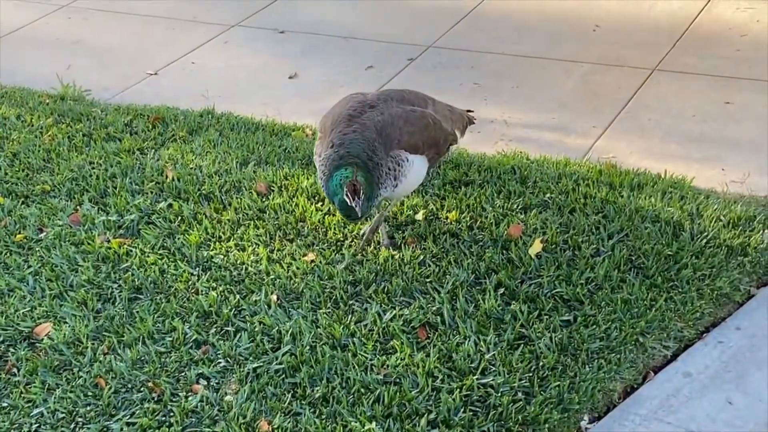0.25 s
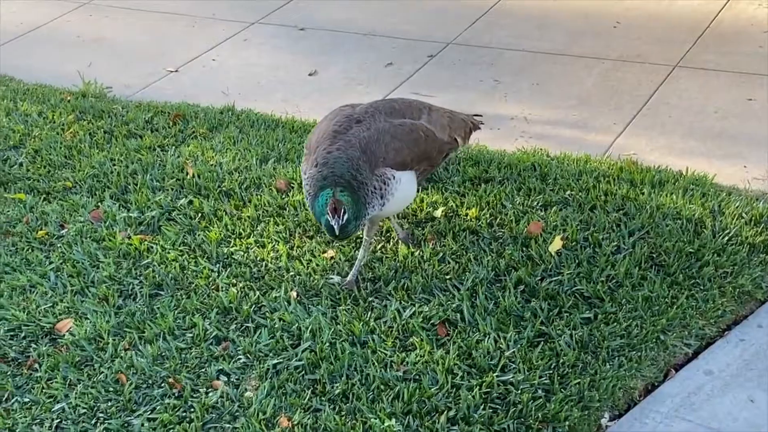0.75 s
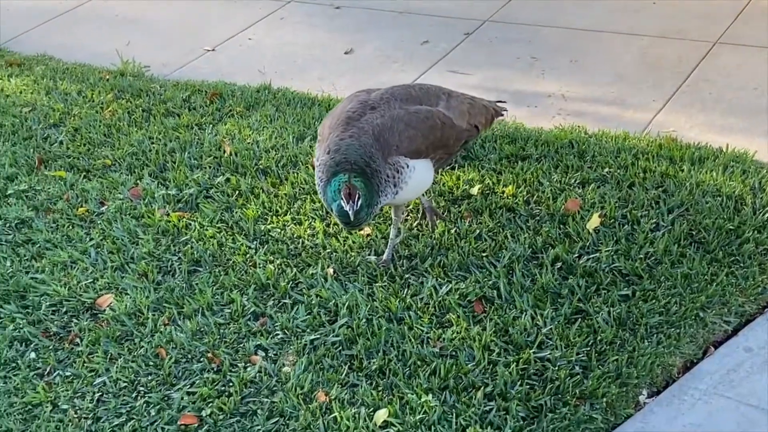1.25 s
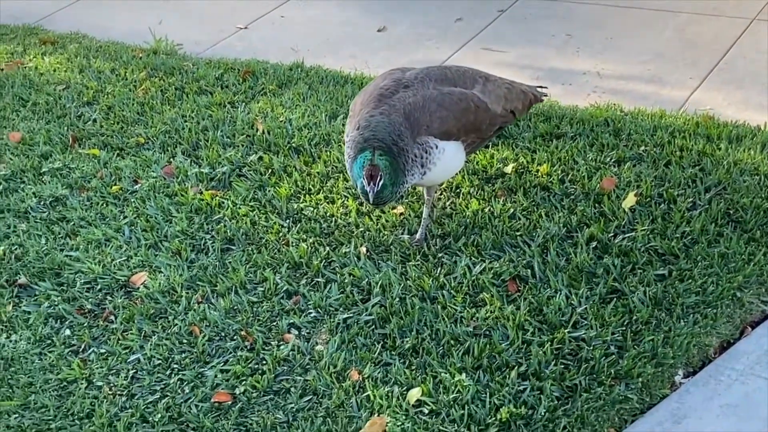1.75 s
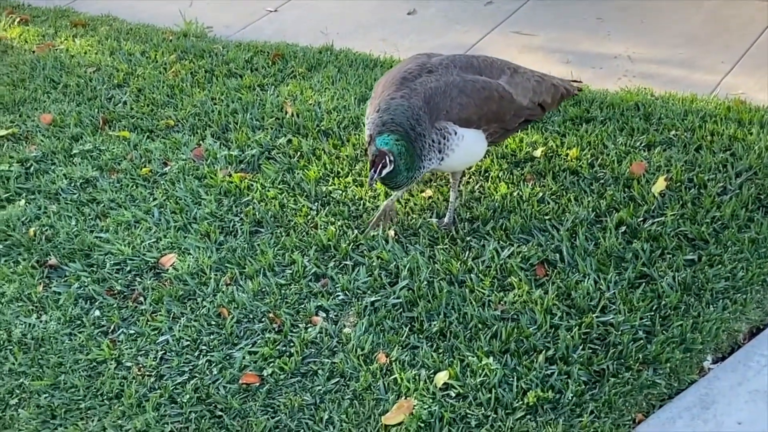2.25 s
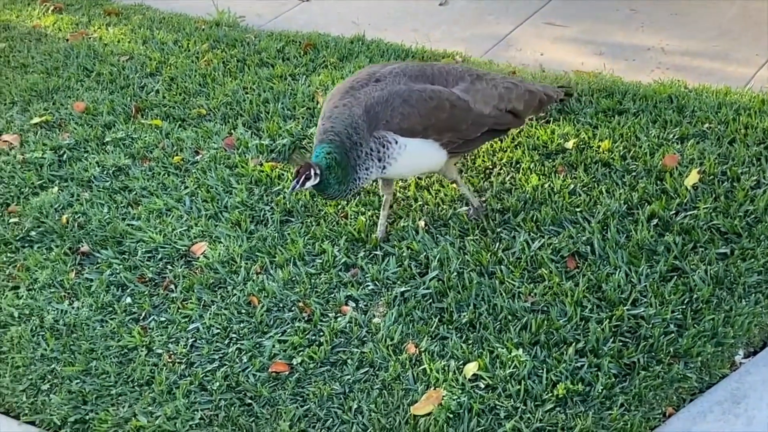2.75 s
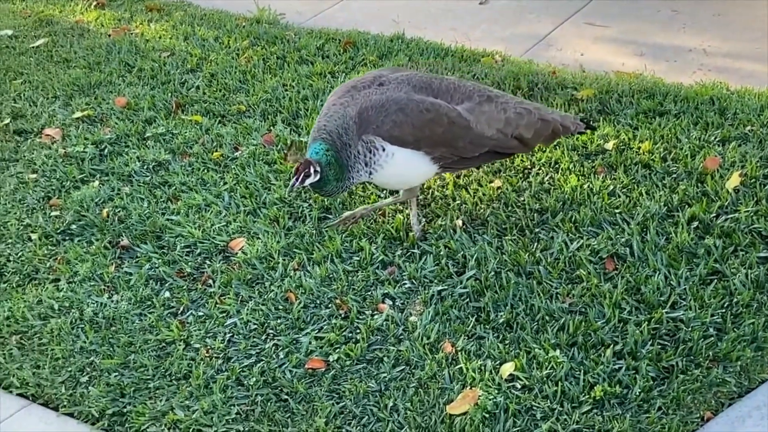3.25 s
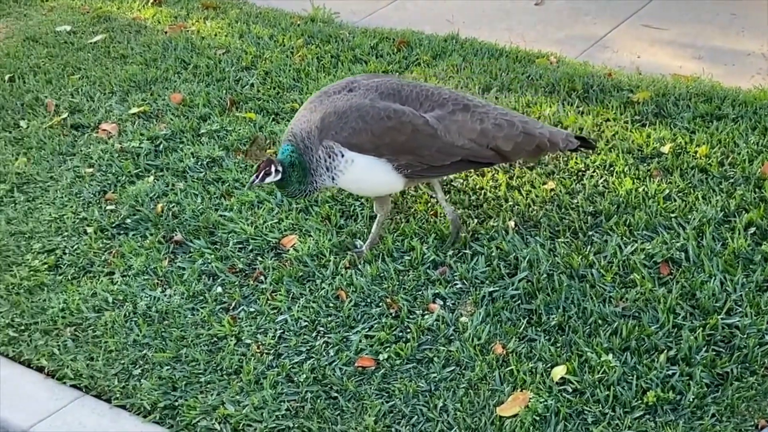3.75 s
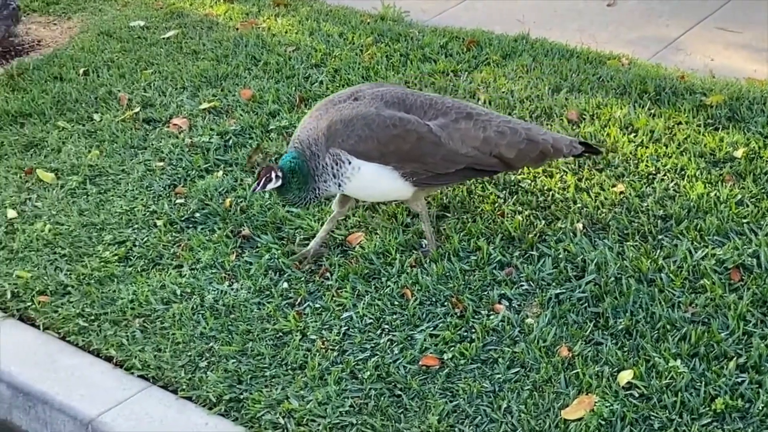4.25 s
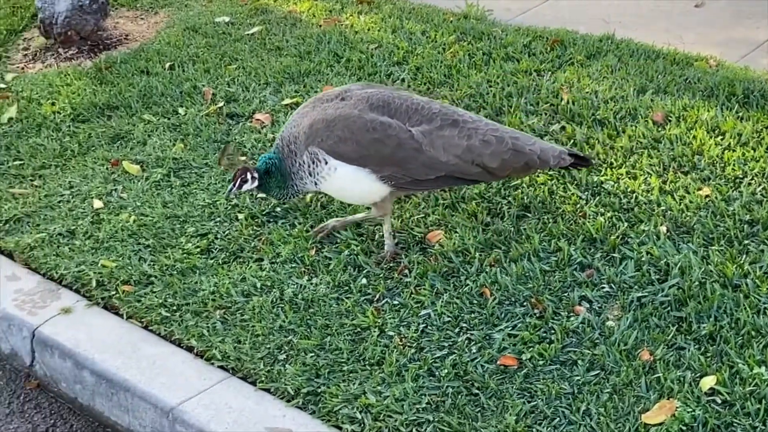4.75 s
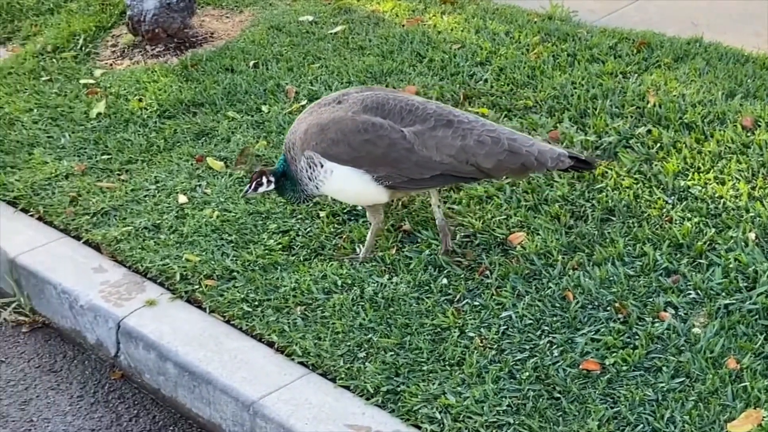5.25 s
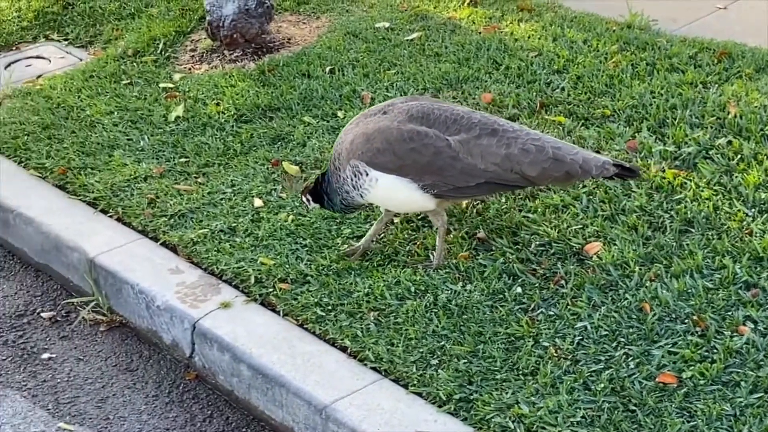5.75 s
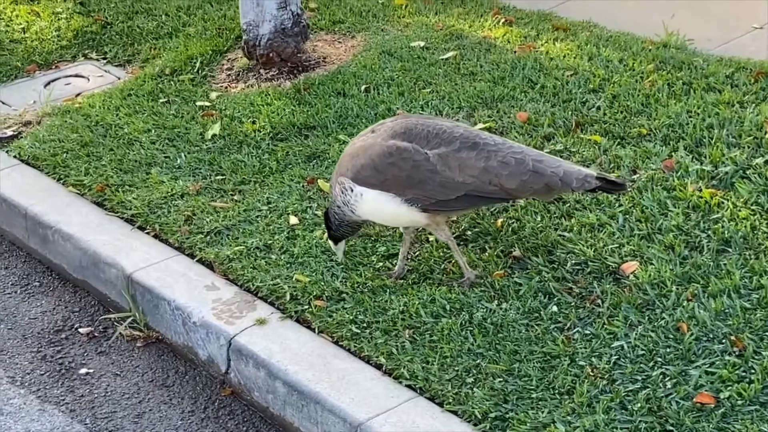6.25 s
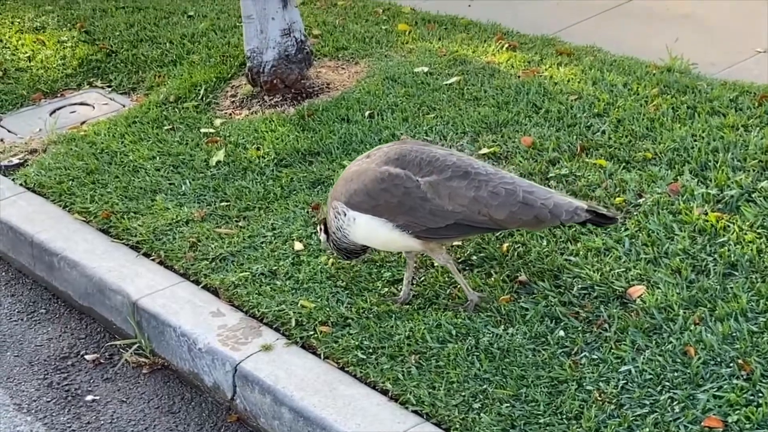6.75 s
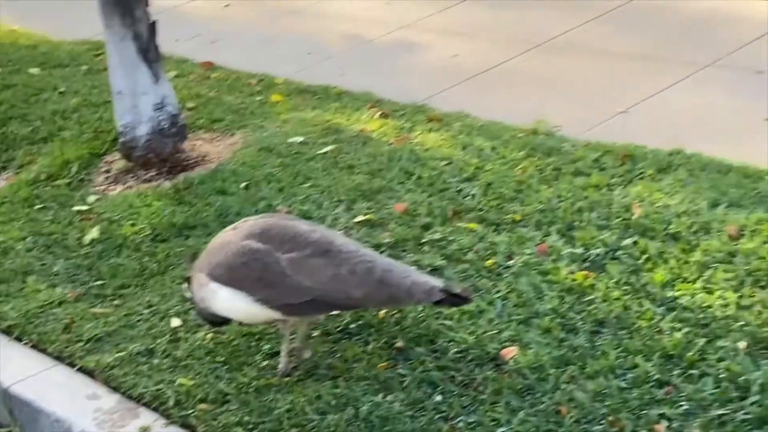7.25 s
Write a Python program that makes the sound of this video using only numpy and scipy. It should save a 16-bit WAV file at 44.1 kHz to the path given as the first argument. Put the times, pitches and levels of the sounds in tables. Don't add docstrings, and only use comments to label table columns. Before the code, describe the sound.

Outdoors on grass beside a quiet residential street, picked up by a hand-held phone. Distant traffic rumbles while a songbird rattles off quick steep chips and far birds whistle. Light footsteps crackle in dry grass. A crow caws three times, rough and throbbing. A car approaches with low tyre noise and engine hum, then a peafowl clucks and gives two loud, nasal screams that bounce off house walls.

```python
import sys
import numpy as np
from scipy import signal
from scipy.fft import rfft, irfft, next_fast_len
from scipy.io import wavfile
from scipy.ndimage import uniform_filter1d, minimum_filter1d

SR = 44100
rng = np.random.default_rng(int(sys.argv[2]) if len(sys.argv) > 2 else 0)


def dump(signal):
    limited = np.clip(np.atleast_2d(signal).T, -1, 1)
    pcm = np.round(limited * 32767).astype(np.int16)
    wavfile.write(sys.argv[1], SR, pcm)


def amplitude_ratio(level_db):
    exponent = np.asarray(level_db, float) / 20
    return 10 ** exponent


N = 330750


def evened(x):
    return x / np.sqrt(np.mean(abs(x) ** 2) + 1e-20)


def read(points, hz):
    f, value = np.transpose(points)
    return np.interp(np.log(hz + 1), np.log(f + 1), value)


def curve(rows, column):
    rows = np.array(rows)
    return np.interp(np.arange(N) / SR, rows[:, 0], rows[:, column])


def add(mix, s, sound):
    part = mix[max(round(s * SR), 0):][:len(sound)]
    part += sound[:len(part)]


def wander(count, hz):
    settle = SR // 10
    lowpass = signal.butter(4, hz, fs=SR, output="sos")
    return evened(signal.sosfilt(lowpass, rng.standard_normal(count + settle))[settle:])


def resonate(x, hz, width_hz):
    turn = np.exp(2j * np.pi * np.cumsum(hz * np.ones(len(x))) / SR)
    r = np.exp(-np.pi * width_hz / SR)
    return 2 * (turn * signal.lfilter([1 - r], [1, -r], x / turn)).real


def resonate_twice(x, hz, width_hz):
    return resonate(resonate(x, hz, width_hz), hz, width_hz)


def fuzzy_tone(length, from_hz, to_hz, db, width_hz, unsteady=1.0):
    count = round(length * SR)
    waver = 1 + unsteady * (wander(count, width_hz) + 1j * wander(count, width_hz))
    tone = waver * np.exp(2j * np.pi * np.cumsum(np.linspace(from_hz, to_hz, count)) / SR)
    return amplitude_ratio(db) * evened(tone.real) * signal.windows.tukey(count, .5)


# (frequency [Hz], likeness [0-1])
LIKENESS = [(60, .97), (200, .85), (600, .7), (1400, .45), (2500, .88), (4500, .98), (9000, .97),
            (15000, .96)]


def wash(shape_db, patchy_db):
    frames = N // 256 + 5
    hz = np.fft.rfftfreq(1024, 1 / SR)[:, None]
    a, b, c, d, patches = rng.standard_normal((frames, 513, 5)).T
    patches = uniform_filter1d(patches, size=10, axis=0)
    patches = evened(uniform_filter1d(patches, size=14, axis=1))
    same = np.clip(read(LIKENESS, hz), 0, 1)
    left = a + 1j * b
    z = np.array([left, same * left + np.sqrt(1 - same ** 2) * (c + 1j * d)])
    z *= amplitude_ratio(shape_db(hz, np.arange(frames) * 256 / SR) + patchy_db * patches)
    return signal.istft(z, nperseg=1024, noverlap=768)[1][:, :N]


# (frequency [Hz], time to fall 60 dB [s])
STREET_DECAY = [(200, .5), (700, .5), (1450, .6), (3000, .7), (6000, .6), (12000, .4)]


def street(x, tail_db):
    taps = np.zeros((2, SR))
    at = np.arange(2000, SR - 20, 20) + rng.integers(0, 20, (2, (SR - 2001) // 20))
    np.put_along_axis(taps, at, rng.choice([-1., 1.], at.shape), 1)
    taps[1] = 2.3 * taps[0] + 1.55 * taps[1]
    hz, t, z = signal.stft(taps, SR, nperseg=256)
    decay_db = -60 * t / read(STREET_DECAY, hz)[:, None]
    tail = signal.istft(z * amplitude_ratio(decay_db), SR, nperseg=256)[1]
    tail /= np.linalg.norm(tail[0])
    return x + amplitude_ratio(tail_db) * signal.fftconvolve(x[None], tail, axes=1)[:, :N]


# (frequency [Hz], left lead [rad])
PORT_PHASE = [(0, 0), (430, -.5), (700, -1.4), (1300, -2.5), (1400, -3.4), (1480, -3.7), (1900, -5.2),
              (2150, -6), (2900, -5.8), (4200, -6.2), (7490, -6.4), (8530, -8.7), (9220, -9.8),
              (12600, -15.3), (13750, -16.1), (15100, -18.9)]


def ports(pair, tilt_db=((60, -.8), (1500, -.6), (4000, 0))):
    size = next_fast_len(N + SR)
    hz = np.fft.rfftfreq(size, 1 / SR)
    half = np.exp(.5j * np.interp(hz, *np.transpose(PORT_PHASE))) * amplitude_ratio(.5 * read(tilt_db, hz))
    return irfft(rfft(pair, size) * np.array([half, 1 / half]), size)[:, :N]


# (frequency [Hz], level per Hz [dB])
TOWN_SPECTRUM = [(15, -65), (25, -25), (43, 0.5), (92, -4), (180, -12), (206, -15), (476, -24), (641, -25),
                 (734, -27), (863, -29.5), (1790, -34), (2000, -39), (2760, -43.5), (5730, -50),
                 (16000, -75)]
# (time [s], half length [s], level [dB])
FAR_TYRES = (1.28, 0.4, 5.9)
# (time [s], half length [s], level [dB])
HUM_LULL = (2.54, 1, -5)


def town():
    def band(hz, mid_hz):
        return np.exp(-.5 * (np.log2((hz + 1) / mid_hz) / 0.84) ** 2)

    def bump(t, s, half, db):
        return db * np.exp(-.5 * ((t - s) / half) ** 2)

    sway_db = -4.5 * wander(N + 2048, 1.4)[::256]

    def shape_db(hz, t):
        rumble_db = band(hz, 92) * sway_db[:len(t)]
        hum_db = band(hz, 420) * (bump(t, *HUM_LULL) + 0.69)
        hiss_db = band(hz, 1300) * (bump(t, *FAR_TYRES) + 5.8 - 0.26 * t)
        return read(TOWN_SPECTRUM, hz) + rumble_db + hum_db + hiss_db

    return amplitude_ratio(-46) * evened(wash(shape_db, 1.8))


# (frequency [Hz], level per Hz [dB])
TYRE_SPECTRUM = [(30, -11), (70, 3.5), (170, -5), (300, -14), (600, -17.5), (1200, -26), (2500, -35),
                 (5000, -48.5), (9000, -64), (16000, -67)]
# (time [s], level [dB])
CAR_LEVEL = [
    (4.3, -57.5),
    (4.65, -47.5),
    (5.5, -45),
    (6.2, -45),
    (7.5, -47.5),
]


def car_tyres():
    def shape_db(hz, t):
        tilt_db = 0.31 + 1.23 * (t - CAR_LEVEL[1][0])
        return read(TYRE_SPECTRUM, hz) + np.log2(hz / 100 + 0.11) * tilt_db

    return amplitude_ratio(curve(CAR_LEVEL, column=1)) * evened(wash(shape_db, 1.18))


# (time [s], length [s], frequency from [Hz], frequency to [Hz], level [dB])
LOW_DRONES = [
    (0, .75, 170, 165, -59),
    (4.56, .34, 250, 265, -57),
    (5.2, .7, 140, 185, -57),
    (6.05, .35, 190, 205, -58),
    (6.25, .7, 103, 108, -53),
    (6.66, .32, 249, 256, -41),
    (4.6, .5, 80, 76, -50),
    (4.9, 2.8, 76, 79, -51),
]


def low_drones():
    out = np.zeros(N)
    for start, *note in LOW_DRONES:
        add(out, start, fuzzy_tone(*note, width_hz=2.5, unsteady=.3))
    return out


# (time [s], level [dB])
CHORUS_LEVEL = [(0, -79), (1.7, -69.5), (3.6, -72), (3.9, -90), (4.6, -83), (7.5, -102)]


def chorus():
    band = wash(lambda hz, t: -30 * abs(np.log2((hz + 1) / 4300) / .32) ** 3 / 10 + 0 * t, 2.5)
    return amplitude_ratio(curve(CHORUS_LEVEL, column=1)) * evened(band)


# (time [s], length [s], frequency from [Hz], frequency to [Hz], level [dB])
QUICK_SLURS = [(0, 0.021, 3710, 3740, -57), (0.078, .031, 3525, 3630, -62.5), (0.95, 0.035, 6750, 6900, -77),
               (1.03, .03, 7300, 7400, -73), (1.024, 0.044, 2720, 2400, -66), (1.168, .015, 7540, 4970, -71),
               (1.496, 0.05, 4130, 3500, -63.5), (3.505, 0.091, 6900, 7500, -73),
               (3.795, 0.029, 5980, 5640, -66), (3.805, 0.04, 5650, 5500, -66),
               (4.628, 0.081, 4400, 4200, -68), (4.678, .06, 3940, 3400, -71.5),
               (5.05, 0.075, 6500, 8100, -74), (6.063, .055, 6700, 7500, -75)]


def slurs():
    out = np.zeros(N)
    for s, *note in QUICK_SLURS:
        add(out, s, fuzzy_tone(*note, width_hz=90, unsteady=.45))
    return out


# (time [s], level [dB], foot of the dive [Hz])
BIRD_CHIPS = [(0.0574, -57, 3400), (0.1431, -51.5, 3700), (0.2344, -52, 3720), (0.3222, -51, 3620),
              (0.402, -54, 3400), (0.4798, -52, 3550), (0.5544, -53, 3700), (0.6314, -56, 3750),
              (0.7143, -57, 3760), (0.782, -60, 4100), (0.837, -59, 4000), (0.894, -59, 3900),
              (0.948, -58, 3800), (1.007, -58, 3800), (1.063, -57.5, 3800), (1.119, -58, 3750),
              (1.182, -59, 3600), (1.243, -59, 3700), (1.309, -60, 3450)]


def chips():
    out = np.zeros(N)
    gaps = np.diff(np.transpose(BIRD_CHIPS)[0])
    for (s, db, foot_hz), gap in zip(BIRD_CHIPS, np.append(gaps, gaps[-1])):
        broken = 1 + .3 * wander(round(gap * SR) + 1, 250)
        t = np.arange(0, 0.49 * gap, 1 / SR)
        along = t / t[-1]
        dive_hz = 3600 * min(gap / .08, 1) ** 1.5 * np.exp(-t / (.088 * gap))
        hz = foot_hz + dive_hz + 200 * (1 - along)
        swell = abs(np.sin(np.pi * along)) ** 0.3 * (.65 + .7 * along)
        tone = np.sin(2 * np.pi * np.cumsum(hz) / SR)
        add(out, s - .003, amplitude_ratio(db - 5.5) * broken[:len(t)] * swell * tone)
    return out


# (time [s], length [s], frequency [Hz], level [dB])
FAR_WHISTLES = [(0.057, 0.11, 4700, -72), (0.202, 0.33, 4680, -69), (0.436, 0.18, 4320, -67.5),
                (0.759, 0.19, 4400, -71), (0.796, 0.12, 5150, -76), (1.057, .12, 4980, -68),
                (1.967, 0.064, 5350, -64), (2.193, 0.08, 3850, -74), (3.215, .14, 4970, -76),
                (3.445, 0.24, 4760, -70.5), (3.82, 0.24, 5560, -77.5), (4.101, 0.44, 3970, -78.5),
                (4.973, 0.36, 3950, -72), (5.843, 0.2, 4000, -79)]
# (time [s], length [s], frequency [Hz], level [dB])
FAR_WARBLES = [
    (1.125, 0.16, 5080, -71),
    (1.439, 0.14, 4290, -63),
    (3.439, 0.38, 3990, -74),
    (5.696, 0.095, 4260, -66),
]


def whistles():
    out = np.zeros(N)
    for s, length, hz, db in FAR_WHISTLES:
        note = fuzzy_tone(length, hz * rng.uniform(.985, 1.015), hz, db, width_hz=130)
        add(out, s, note * np.clip(.9 + .35 * wander(len(note), 25), 0, 2))
    for s, length, hz, db in FAR_WARBLES:
        add(out, s, fuzzy_tone(length, hz, hz, db, width_hz=350))
    return out


# (frequency [Hz], level per Hz [dB])
GRASS_SPECTRUM = [(2940, -38), (5000, -22.5), (7980, -6), (8460, 4.5), (8790, -1.5), (11300, 2),
                  (13400, 0.5), (14600, -4), (16000, -10)]
# (time [s], level [dB])
FOOTSTEPS = [(.12, -90), (.53, -79), (1.04, -74), (1.52, -82), (1.93, -72), (2.19, -73.5), (2.49, -68),
             (2.72, -70.5), (3.24, -88), (3.45, -73.5), (3.78, -81), (4.25, -77), (4.4, -91), (4.56, -85),
             (4.93, -73), (5.75, -82), (6.22, -88)]


def rustle():
    crackle = amplitude_ratio(2.2 * rng.exponential(1, N)) * (rng.random(N) < 3000 / SR)
    grains = np.sqrt(uniform_filter1d(crackle ** 2, size=24).clip(0)) + 0.19
    t = np.arange(N) / SR
    level = amplitude_ratio(-83)
    for s, db in FOOTSTEPS:
        level = level + amplitude_ratio(db - np.maximum((s - t) * 259, (t - s) * 103))
    hiss = wash(lambda hz, t: read(GRASS_SPECTRUM, hz) + 0 * t, 0.58)
    return level * amplitude_ratio(1.0) * evened(hiss * grains)


# (time [s], level [dB], low part [dB])
BLADE_SNAPS = [(1.028, -64, 4), (1.0365, -62, 2), (1.039, -59, 2), (1.0415, -60, 2), (1.044, -61, 2),
               (1.049, -64, 2), (4.948, -56, -3), (1.925, -63, 1), (2.6269, -59, -11), (2.6854, -65, 5),
               (2.7224, -57, -12), (2.772, -55, -6), (3.2286, -56, -12.5), (4.2487, -57, -6),
               (4.2778, -56, -5.5), (4.405, -57, -8), (4.5506, -55, -20), (4.948, -35.5, -27),
               (6.203, -58, -10), (6.266, -60, 2)]


def snaps():
    out = np.zeros(N)
    t = np.arange(2000) / SR
    for s, db, low_db in BLADE_SNAPS:
        decay = amplitude_ratio(db + 3 - 60 * t / 0.007) * np.minimum(t / 0.0006, 1)
        burst = rng.standard_normal(len(t)) * decay
        crisp = 1.95 * resonate_twice(burst, 11300, 3700)
        add(out, s, crisp + 5.3 * amplitude_ratio(low_db) * resonate(burst, 1900, 2200))
    return out


# (time [s], length [s], effort [dB], beak opening factor [1])
CROW_CAWS = [
    (1.824, 0.345, -49.5, .99),
    (2.324, 0.33, -49, 1.0),
    (2.855, 0.31, -48.5, 1.035),
]
# (frequency [Hz], width [Hz], level [dB])
CROW_THROAT = [(1416, 240, 8), (1960, 270, -3.5), (2450, 300, -18), (2810, 62, -14), (3140, 300, -6),
               (4530, 1400, -18.5), (5860, 700, -24.5)]


def crow():
    out = np.zeros(N)
    for start, length, effort_db, beak in CROW_CAWS:
        t = np.arange(0, length, 1 / SR)
        turns = np.cumsum(480 * (1 + 0.2 * wander(len(t), 200))) / SR
        pulses = evened(np.diff(np.floor(turns), prepend=0)) + 0.34 * rng.standard_normal(len(t))
        pulses *= 1 + .5 * np.sin(2 * np.pi * np.cumsum(70 + 15 * wander(len(t), 30)) / SR)
        droop = 1 - 0.024 * (t / length) ** 2
        throat = 0
        for f, width_hz, db in CROW_THROAT:
            f = f * droop * (beak if f > 3000 else 1)
            throat = throat + amplitude_ratio(db) * evened(resonate_twice(pulses, f, width_hz))
        swell_db = np.interp(t, [0, 0.08, length - 0.072, length], [-3.5, 0, -4, -10.5])
        caw = amplitude_ratio(effort_db + swell_db + 6) * evened(throat)
        add(out, start, caw * signal.windows.tukey(len(t), .1))
    return out


# (time [s], level [dB], modes as (frequency [Hz], level [dB]))
FAR_TAP = (2.669, -53.5, [(800, 10.5), (1500, -17), (2250, 5)])


def tap():
    out = np.zeros(N)
    s, db, modes = FAR_TAP
    t = np.arange(600) / SR
    ring = sum(amplitude_ratio(m) * np.sin(2 * np.pi * f * t) for f, m in modes)
    add(out, s, amplitude_ratio(db + 4 - 60 * t / .012) * ring)
    return out


# (time [s], length [s], pitch [Hz], fundamental [dB], 2nd harmonic [dB], 3rd harmonic [dB])
PEAFOWL_CLUCKS = [
    (6.285, 0.014, 656, -33.5, -33.5, -64),
    (6.299, 0.022, 665, -33.5, -27, -54),
    (6.349, 0.013, 650, -32.5, -43, -66),
    (6.998, 0.013, 615, -38, -18.5, -30.5),
    (7.192, 0.016, 753, -42, -29, -40),
]


def clucks():
    out = np.zeros(N)
    for s, length, hz, *levels_db in PEAFOWL_CLUCKS:
        t = np.arange(0, length, 1 / SR)
        tone = sum(amplitude_ratio(db) * np.sin(2 * np.pi * k * hz * t) for k, db in enumerate(levels_db, 1))
        add(out, s, np.hanning(len(t)) * tone)
    return out


# (frequency [Hz], width [Hz], level [dB])
BLURRED_LINE = (1950, 130, -48)


def scream(pitch, rows, voice, flutter, strength, attack_s, comb):
    s, *columns = np.transpose(rows)
    release_s = .011
    t = np.arange(s[0], s[-1] + 2 * release_s, 1 / SR)
    count, since = len(t), t - s[0]
    effort_db, gape, beak_hz = (np.interp(t, s, c) for c in columns)
    edge_db = -24 * (np.clip(1 - since / attack_s, 0, 1) + np.clip((t - s[-1]) / release_s, 0, 2))
    *low_db, upper_db, throat_db, beak_db = strength
    upper_db = upper_db + effort_db + edge_db * np.where(t < s[-1], 1, .3)
    late = np.clip(1 - since / (2.4 * attack_s), 0, 1)
    throat_hz = 1100 + 1100 * gape
    hz = uniform_filter1d(np.interp(t, *np.transpose(pitch)), size=900, mode="nearest")
    slope = abs(np.gradient(hz)) * SR
    slide = np.clip(slope / 350, 0, 1.3)

    flutter_hz, swing, throb, hoarse, breath_db = flutter
    rush = np.clip((s[0] + .2 - t) / .03, 0, 1)
    deep = throb * (2.2 + 1.3 * np.clip(1.6 - since / .08, 0, 1)) * (1 + .25 * wander(count, 14))
    beat = 2 * np.pi * (np.cumsum(flutter_hz + 5.6 * rush + 3 * wander(count, 14)) / SR - .4)
    lean = np.pi * np.clip(1.5 - since / .1, 0, 1)

    unsteady = hoarse * (1 + rush) + .00002 * slope
    grain = 1.1 * np.clip(slope / 1300 - .12 + 90 * hoarse, 0, 2.2) * wander(count, 170)
    phase = 2 * np.pi * np.cumsum(hz) / SR
    phase += swing * (1 + .15 * wander(count, 8)) * np.sin(beat) + unsteady * wander(count, 140)

    out = amplitude_ratio(breath_db + upper_db) * (1 + np.cos(phase)) * np.diff(rng.standard_normal(count + 2), 2)
    wheeze_hz, width_hz, db = BLURRED_LINE
    wheeze = evened(resonate(rng.standard_normal(count), wheeze_hz, width_hz))
    out += swing / .15 * amplitude_ratio(db + edge_db) * wheeze
    rasp = evened(resonate_twice(rng.standard_normal(count), 1.82 * hz, 260))
    out += throb * amplitude_ratio(-11 + low_db[1] + throat_db + effort_db + edge_db) * rasp

    under = 2 * np.pi * np.cumsum(235 + 25 * wander(count, 30)) / SR
    for k in range(1, 24):
        if k < 4:
            db = low_db[k - 1] + edge_db + effort_db * (.7 if k == 1 else 1)
        else:
            db = upper_db + np.interp(k, *np.transpose(voice))
            db = db + late * (-18 - 1.8 * (k - 4)) + 0.011 * (k - 4) * effort_db
        db = db + throat_db / (1 + ((k * hz - throat_hz) / 260) ** 2)
        db = db + beak_db / (1 + ((k * hz - beak_hz) / 170) ** 2)
        db = db + sum(lift_db / (1 + ((k * hz - f) / w) ** 2) for f, w, lift_db in comb)
        flicker_db = (8 * throb / (2 + k / 8) + 2 / 3 * slide) * min(k - 1, 3)
        db = db + flicker_db * np.minimum(wander(count, 20), .7) - (k > 16) * 10 * slide
        level = amplitude_ratio(db) * (k * hz < 15500)
        depth = throb if k == 1 else deep * (1.6 if k == 3 else 1 if k < 5 else .35)
        throbbing = 1 + depth * np.cos(beat + k - 2 + lean)
        out += level * throbbing * np.cos(k * phase + k * k + (k / 14) ** 4 * grain)
        if k > 3:
            faint = 1.3 * throb * np.clip(.7 + .6 * wander(count, 12), 0, 2)
            out += level * faint * np.cos(k * phase - under)
    return s[0], np.sqrt(2) * out * signal.windows.tukey(count, .02)


# (time [s], length [s], frequency from [Hz], frequency to [Hz], width [Hz], level [dB])
AIR_PUFF = (6.387, .07, 8300, 6800, 1300, -50)


def puff():
    out = np.zeros(N)
    s, length, from_hz, to_hz, width_hz, db = AIR_PUFF
    count = len(np.arange(0, length, 1 / SR))
    air = resonate(rng.standard_normal(count), np.linspace(from_hz, to_hz, count), width_hz)
    add(out, s, amplitude_ratio(db) * signal.windows.tukey(count, .3) * evened(air))
    return out


# (time [s], pitch [Hz])
SCREAM_PITCH = [
    [(6.36, 672), (6.42, 690), (6.47, 711), (6.58, 738), (6.7, 742), (6.86, 737), (6.94, 729), (6.98, 718),
     (7.02, 708)],
    [(7.19, 588), (7.22, 613), (7.26, 639), (7.3, 652), (7.392, 685), (7.407, 690), (7.5, 691.8)],
]
# (time [s], effort [dB], gape [0-1], beak resonance [Hz])
SCREAM_BEAK = [
    [(6.372, 4, 0.22, 3920), (6.425, 1, 0.22, 4100), (6.49, -1.5, 0.26, 4230), (6.55, -1.5, 0.41, 3950),
     (6.7, 1, 0.45, 4390), (6.8, 1, .45, 4210), (6.87, 2, 0.45, 4300), (6.93, -3, 0.24, 4400),
     (6.985, -2.5, 0.34, 4300)],
    [(7.198, 9.5, 0.27, 3900), (7.218, -3, 0.68, 4000), (7.24, -9, 0.71, 3930), (7.28, -5.5, 0.34, 4500),
     (7.305, -1.5, 0.34, 4690), (7.34, -5, 0.48, 4240), (7.385, -1, 0.53, 3976), (7.42, 1.5, 0.69, 4020),
     (7.52, -1.5, 0.94, 3830)],
]
# (multiple [1], level [dB])
SCREAM_HARMONICS = [
    [(4, 1.5), (5, -0.5), (6, -3), (7, 1.5), (8, 0), (9, -1), (10, -7.5), (11, -7), (12, -2), (13, -5),
     (14, -7.5), (15, -18), (16, -8), (18, -11.5), (21, -17)],
    [(4, 1.5), (5, 6), (6, 1), (7, -2), (8, -2.5), (9, -4), (10, -13), (11, -9.5), (12, -6), (13, -9),
     (14, -7), (15, -20), (16, -28), (17, -14), (18, -19), (19, -23), (20, -28), (21, -11), (22, -17)],
]
# (flutter [Hz], phase swing [rad], level swing [0-1], hoarseness [rad], breath [dB])
SCREAM_FLUTTER = [
    (51.3, .115, .14, .028, -27),
    (45, .01, .03, .001, -54),
]
# (fundamental [dB], 2nd [dB], 3rd [dB], upper ones [dB], throat lift [dB], beak lift [dB])
SCREAM_STRENGTHS = [
    (-30, -40.5, -41.5, -42, 23.5, 10.5),
    (-32.5, -29.5, -39, -32.5, 19, 16),
]
# (frequency [Hz], width [Hz], level [dB])
SCREAM_BANDS = [
    [(1355, 45, 5.5), (2050, 60, -11), (2170, 25, -6), (4830, 70, -8), (4260, 43, 3.5)],
    [(692, 4, 4), (1373, 16, -14), (2500, 35, -7), (2770, 14, 7.5), (3463, 7.6, -15.5), (4155, 4.5, -2),
     (6230, 18, -12)],
]
# (delay [s], level [dB])
WALL_ECHOES = [(.0042, -24.5), (.011, -11.5), (.019, -13), (.031, -19), (.047, -23)]
# (delay [s], level [dB], favoured frequency [Hz], width [Hz])
FACADE = (.2, -13, 1475, 70)
# (frequency [Hz], left minus right [dB])
ECHO_TILT = [(300, 0), (1340, -1), (1425, -3), (1460, -5.5), (1485, -7.5), (1525, 0), (1960, 1), (2040, 12),
             (2075, 6), (2200, 1), (15000, 0)]


def peafowl():
    bird = clucks() + puff()
    attacks_s = (.035, .016)
    for call in zip(SCREAM_PITCH, SCREAM_BEAK, SCREAM_HARMONICS, SCREAM_FLUTTER, SCREAM_STRENGTHS,
                    attacks_s, SCREAM_BANDS):
        add(bird, *scream(*call))
    heard = street(.8 * bird, -23)
    for side, port in enumerate(heard):
        for delay, db in WALL_ECHOES:
            aslant = side * (delay > .025) / SR
            add(port, delay + aslant, amplitude_ratio(db) * bird)
    delay, db, hz, width_hz = FACADE
    add(heard.T, delay, amplitude_ratio(db) * resonate(bird, hz, width_hz)[:, None])
    return ports(heard, ECHO_TILT)


def scene():
    traffic = town() + car_tyres() + low_drones()
    songbirds = street(slurs() + chips() + whistles(), -15)
    grass = rustle() + snaps()
    far = street(crow() + tap(), -18)
    return ports(traffic + chorus() + songbirds + grass + far) + peafowl()


def roll_off(x):
    return signal.sosfilt(signal.butter(12, 16410, fs=SR, output="sos"), x)


def record(dry):
    x = signal.sosfilt(signal.butter(3, 44, "highpass", fs=SR, output="sos"), dry)
    hz, _, z = signal.stft(x, SR, nperseg=2048, noverlap=1536)
    power = uniform_filter1d((abs(z) ** 2).mean(0), size=9, axis=0)
    loudest = -minimum_filter1d(-power, size=101, axis=0)
    hidden = (power < loudest * amplitude_ratio(-57)) & (hz[:, None] > 1700)
    hidden = hidden & (power.max(0) > amplitude_ratio(-77))
    muted = hidden | (hz[:, None] > 15850)
    z = z * (1 - .98 * uniform_filter1d(muted * 1., size=3, axis=0))
    mix = signal.istft(z, SR, nperseg=2048, noverlap=1536)[1][:, :N]
    return roll_off(mix)


dry = scene()
out = record(dry)
dump(out)
```